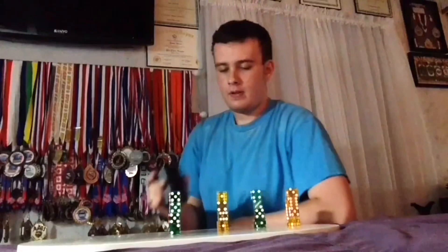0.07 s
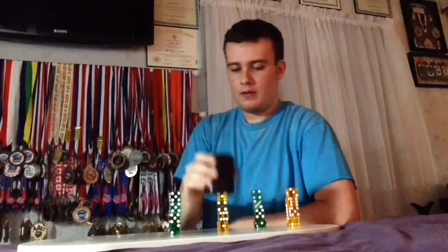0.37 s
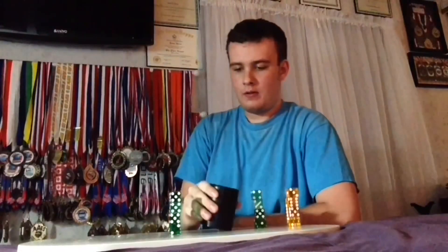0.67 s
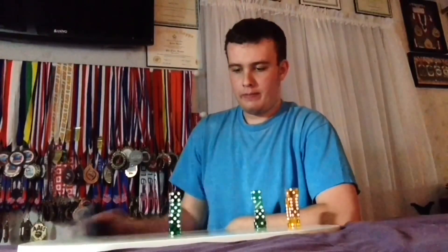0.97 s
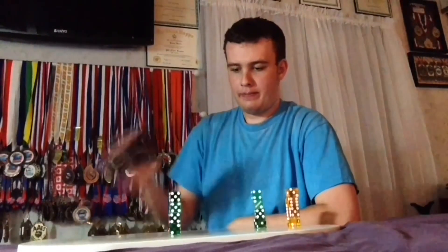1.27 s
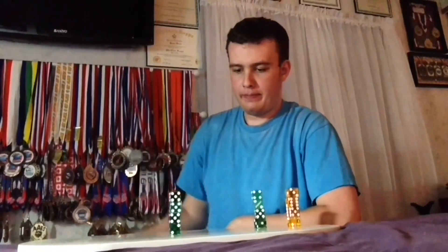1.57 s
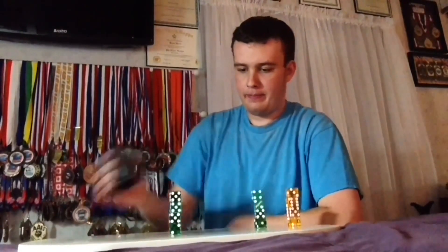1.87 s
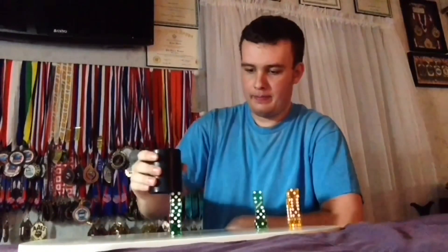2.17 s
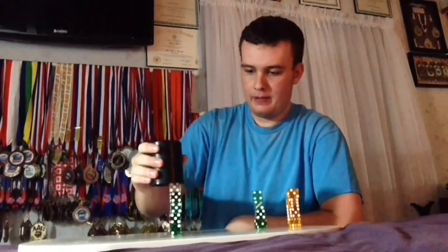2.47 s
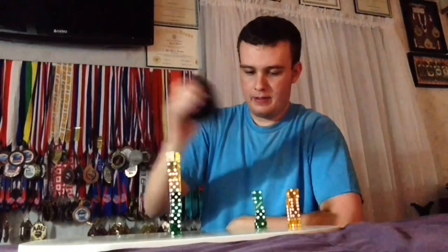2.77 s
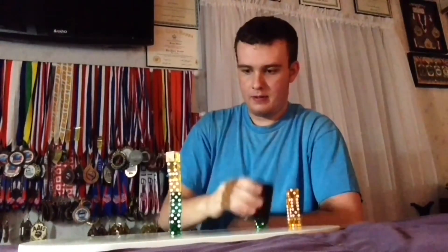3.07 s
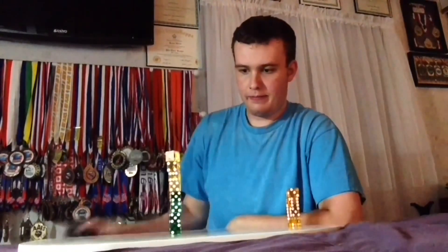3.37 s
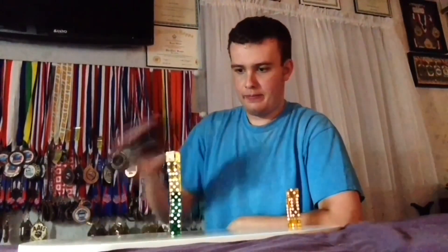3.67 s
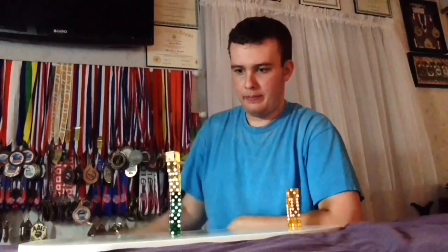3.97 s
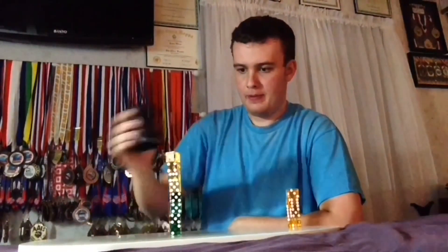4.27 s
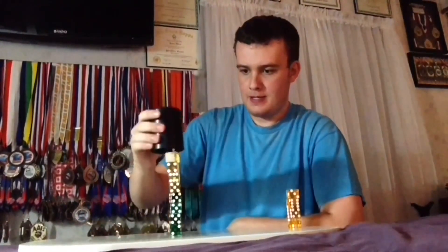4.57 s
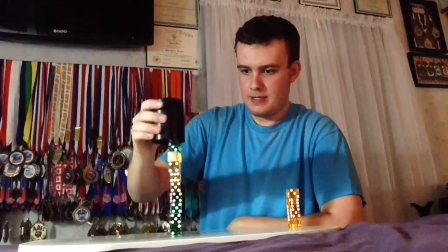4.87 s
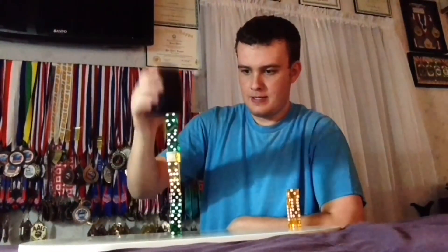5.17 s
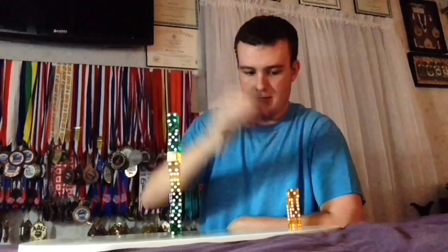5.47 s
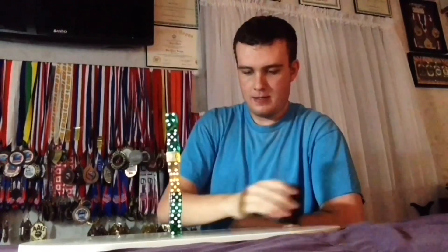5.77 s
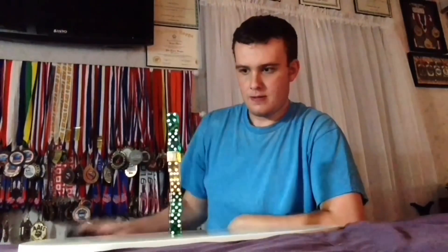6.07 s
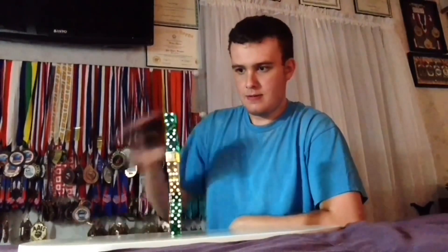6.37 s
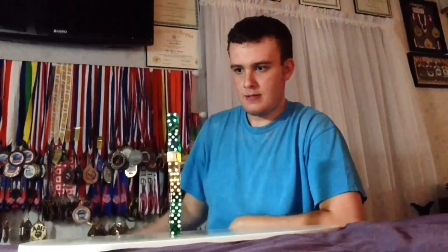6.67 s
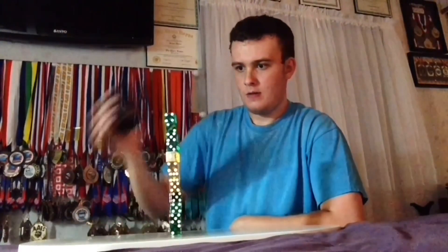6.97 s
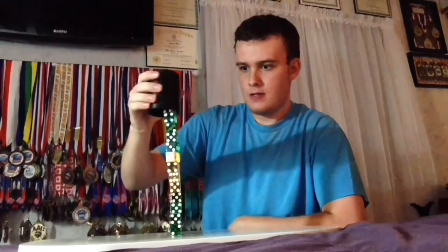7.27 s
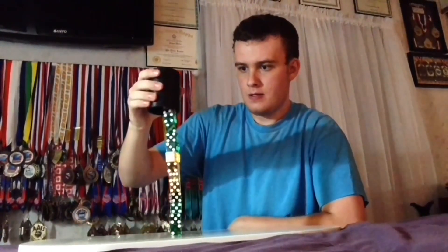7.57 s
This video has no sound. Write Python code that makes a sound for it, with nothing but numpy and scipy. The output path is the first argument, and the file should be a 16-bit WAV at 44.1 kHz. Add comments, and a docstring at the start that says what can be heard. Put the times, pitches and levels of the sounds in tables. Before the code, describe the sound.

A plastic cup scoops dice off a table three times, swirling them with a rattle until they snap into a stack.

```python
"""Dice stacking with a cup

Three times over, a plastic cup knocks on a table and scrapes across it to scoop up dice, then swings so
that they roll and clack round its wall. When it stops dead, inertia slams them into a column.
Each contact is a force that excites resonators: the dice, the cup's wall, the air in the cup, the table.
A small room reverberates briefly over a low steady hum."""
import sys
import numpy as np
from scipy import signal
from scipy.fft import rfft, irfft, next_fast_len
from scipy.io import wavfile
from scipy.ndimage import map_coordinates

SR = 44100
rng = np.random.default_rng(int(sys.argv[2]) if len(sys.argv) > 2 else 0)


def to_wav(sig):
    """Store sig (one row per channel, or 1-D mono) as 16-bit WAV at the path in sys.argv[1].

    Samples outside -1..1 are clipped; the rate is SR.
    """
    pcm = np.clip(np.atleast_2d(sig), -1, 1) * 32767
    pcm = np.round(pcm).astype(np.int16)
    wavfile.write(sys.argv[1], SR, pcm.T)  # frames by channels


N = 335601
SIZE = 16384  # samples in a working block
HZ, AGE = np.fft.rfftfreq(SIZE, 1 / SR), np.arange(SIZE) / SR

# The rim meets the table: (time [s], relative boom level [dB], relative tick level [dB])
RIM_KNOCKS = [(0.55, -24.5, -44.5), (0.556, -46, -36), (0.701, -35, -60), (0.717, -33, -57),
              (3.032, -34.5, -40.5), (3.062, -24, -36.5), (3.071, -21.5, -30), (3.197, -42, -29.5),
              (5.709, -34, -63), (5.859, -38, -54)]
# The rim scoops up dice: (time of hardest push [s], drag [s], trapped air level [dB], grit level [dB])
RIM_SCOOPS = [(0.755, 0.17, -29.5, -35), (3.108, 0.17, -34, -35.5), (5.755, 0.199, -31, -35)]
# Dice slide lightly on the wall between swings: (start [s], end [s], level [dB])
DICE_GLIDES = [(1.1, 1.748, -68.5), (3.394, 3.862, -68.5), (6.105, 6.904, -76)]
# Dice roll: (time of full speed [s], rise [s], hold [s], relative air level [dB], relative dice level [dB])
CUP_SWINGS = [(0.903, 0.065, .09, -44, -41.5), (1.049, 0.037, 0.0067, -42.5, -40.5),
              (1.3, .11, 0.046, -37.5, -38.5), (1.454, .025, 0.084, -39.5, -41),
              (1.869, .065, 0.15, -46, -45), (3.264, .05, 0.122, -42.5, -44),
              (3.658, 0.12, 0.039, -35.5, -39), (3.846, .05, 0.088, -41.5, -42),
              (4.242, 0.073, 0.13, -41, -41), (5.966, 0.074, 0.024, -38.5, -40.5),
              (6.054, 0.044, 0.033, -44.5, -53.5), (6.343, .08, 0.053, -37, -42),
              (6.538, .09, 0.0574, -37.5, -42.5), (6.924, .035, 0.14, -44, -45.5)]
# A die strikes the swinging cup: (time [s], click level [dB], cup air level [dB], wall level [dB])
DIE_CLACKS = [(0.906, -30, -30.5, -42), (0.912, -30, -32, -50.5), (1.051, -33.5, -35.5, -57),
              (1.246, -60, -43, -66), (1.324, -29.5, -30.5, -35), (1.333, -23, -49, -27.5),
              (1.354, -36.5, -48.5, -31), (1.445, -42.5, -33, -42.5), (1.482, -33.5, -36, -44.5),
              (1.535, -40, -39, -55), (1.895, -43.5, -39, -61.5), (3.1, -43, -32, -40),
              (3.109, -31, -34.5, -36), (3.266, -38.5, -38, -51), (3.283, -52, -33.5, -43),
              (3.396, -58, -37, -62), (3.653, -39.5, -32.5, -47), (3.687, -33, -28, -39.5),
              (3.696, -33.5, -48, -45.5), (3.876, -66, -35.5, -57), (3.916, -30.5, -32.5, -38.5),
              (4.246, -34.5, -27.5, -45), (5.749, -38, -33, -54), (5.975, -41, -38, -42),
              (6.063, -53, -37.5, -47.5), (6.312, -59, -39.5, -69.5), (6.365, -32, -36.5, -41),
              (6.533, -49, -37, -45.5), (6.585, -40, -31, -42), (6.97, -34, -36, -60)]
# Dice slam into a column: (time [s], click level [dB], cup air level [dB], relative jolt level [dB])
DICE_SLAMS = [(1.933, -31, -31, -32), (1.941, -24.5, -41, -36.5), (1.952, -23.5, -25.5, -42),
              (1.964, -26, -23.5, -49.5), (1.976, -25.5, -30.5, -45.5), (1.99, -34, -35.5, -51),
              (4.3, -28.5, -45, -33), (4.311, -27, -40.5, -34.5), (4.357, -33.5, -36.5, -56),
              (7.019, -28, -40, -39), (7.026, -36, -39.5, -38), (7.043, -36, -37, -41)]
# The cup touches the stack: (time [s], relative level [dB], ping lift [dB])
STACK_TOUCHES = [(4.782, -52, 13), (5.542, -32, 21), (5.553, -44.5, 20)]

# Resonant modes: (frequency [Hz], width [Hz], lift [dB])
OPEN_CUP_MODES = [(891.5, 140, 12.5), (1008.5, 60, 6), (1557, 90, 13), (1664, 57, 13), (1844, 56, 4.5),
                  (2270, 480, 6.5)]
CLOSED_CUP_MODES = [(487.2, 31, 2.6), (711, 90, 12.7), (776, 100, 9.3), (1578, 230, 7.3), (2440, 170, 10),
                    (3140, 140, 5.5), (3790, 110, 16)]
WALL_MODES = [(2920, 130, 20), (3540, 100, 11)]
TABLE_MODES = [(114, 30, 7.9), (212, 50, 3.9), (352, 54, 2.3)]
STACK_MODES = [(806, 190, 11.5), (1140, 180, 2.2), (2264, 280, 4.9)]  # the standing stack, touched by the cup
COLUMN_MODES = [(4544, 330, 8), (5122, 530, 10)]  # dice pressed together

# Spectral envelopes of the contacts and the hum: (frequency [Hz], relative level [dB])
AIR_SPECTRUM = [(30, -58.5), (90, -43), (250, -15.5), (500, -9.5), (700, -5.5), (1200, 0.5), (2200, -6),
                (3200, -19), (6000, -53.5)]
DICE_SPECTRUM = [(120, -65.5), (600, -39.5), (1800, -10), (2900, -2), (4000, -1), (5300, 0), (6100, -9),
                 (8000, -17), (11500, -25), (14000, -40)]
WALL_SPECTRUM = [(300, -69), (1500, -29.5), (2900, -7.5), (3600, -9), (6000, -50.5)]
CRACK_SPECTRUM = [(200, -60.5), (1500, -18.5), (4500, 3.5), (6500, 3.5), (8500, -3.5), (11500, -6),
                  (14000, -24)]
THUD_SPECTRUM = [(30, -27.5), (70, -19), (130, -11), (220, 1.5), (380, -8), (600, 4), (1100, -15.5),
                 (3000, -51.5)]
RIM_SPECTRUM = [(30, -51), (70, -42), (120, -27), (180, -8.5), (550, -7), (850, -6.5), (1200, -15),
                (1800, -18.5), (2600, -35), (6000, -52)]
SLIDE_SPECTRUM = [(30, -47), (70, -24), (120, -10.5), (190, 1), (320, 0.5), (500, 8), (900, 0), (1300, 7.5),
                  (2100, 7), (3500, 4), (6000, -26.5)]
GRIT_SPECTRUM = [(150, -52), (1000, -17), (2800, -0.5), (4600, -0.5), (5700, -5.5), (7500, -17.5),
                 (11500, -24.5), (14000, -37.5)]
TOUCH_SPECTRUM = [(40, -30.5), (220, 2), (550, 10.5), (1200, 7), (2000, -10.5), (5000, -16.5), (7000, -23),
                  (12000, -34.5)]
GLIDE_SPECTRUM = [(500, -30.5), (2000, -11.5), (4300, -6), (5400, -3.5), (6500, -13), (12000, -21.5)]
HUM_SPECTRUM = [(25, -26), (90, -16), (120, -5), (155, -7), (210, -1), (270, 0), (340, -5), (480, -8),
                (700, -13), (1000, -18), (1350, -15), (2100, -22), (5000, -26), (13500, -31)]

# Decay of the room: (frequency [Hz], time to fall 60 dB [s])
REVERB_TIMES = [(150, 0.25), (700, 0.17), (1600, 0.17), (5000, 0.14), (11000, 0.2)]


def amp(db):
    """Decibels to amplitude ratio."""
    return 10 ** (np.asarray(db) / 20)


def unit(x):
    """Normalise to rms 1."""
    return x / np.sqrt(np.mean(x ** 2) + 1e-20)


def attack_unit(ring):
    """Normalise a transient to rms 1 over its first 6 ms."""
    return ring / np.sqrt(np.mean(ring[:SR // 160] ** 2))


def along(points, hz):
    """Interpolate (frequency, value) points on a logarithmic frequency axis."""
    f, v = np.transpose(points)
    return np.interp(np.log(hz + 1), np.log(f + 1), v)


def add(track, s, sound):
    """Superposition: a sound adds to the track from time s."""
    part = track[round(s * SR):][:len(sound)]
    part += sound[:len(part)]


def wobble(n, rate):
    """Smooth random modulation: a spline through `rate` knots a second."""
    return map_coordinates(rng.standard_normal(256), [np.arange(n) * rate / SR], mode="mirror")


def body(spectrum, modes=()):
    """Resonance: the minimum-phase impulse response of a spectral envelope with modal peaks."""
    peaks_db = sum(lift / (1 + (2 * (HZ - hz) / width) ** 2) for hz, width, lift in modes)
    cepstrum = irfft(np.log(amp(along(spectrum, HZ) + peaks_db)))
    cepstrum[1:SIZE // 2] *= 2  # folding onto positive time makes the response causal
    cepstrum[SIZE // 2 + 1:] = 0
    return irfft(np.exp(rfft(cepstrum)))[:SIZE // 4]


def cup_air(scatter):
    """Cavity resonance: the open cup's air modes shift together with how it is held over the table."""
    detune = 1 + scatter * rng.standard_normal()
    return body(AIR_SPECTRUM, [(hz * detune, width, lift) for hz, width, lift in OPEN_CUP_MODES])


def strike(response, contact_s, chatter, t60):
    """Impact excitation: a short rough push and a decaying chatter of the faces drive a body."""
    t = AGE[:SIZE // 8]
    push = t / contact_s * np.exp(1 - t / contact_s)
    force = rng.standard_normal(len(t)) * (push + chatter * amp(-60 * t / t60))
    return attack_unit(signal.fftconvolve(force, response)[:SIZE // 4])


def patter(n, rate, spread_db, rub):
    """Shot noise: tiny uneven contacts, on average `rate` a second, over a smooth rub."""
    sizes = amp(spread_db * np.clip(rng.standard_normal(n), -2, 2)) * rng.choice([-1, 1], n)
    contacts = rng.random(n) < rate / SR
    return unit(sizes * contacts) + rub * rng.standard_normal(n)


def stroke(force, level_db, parts):
    """Forced vibration: one running force drives each (body, level [dB]) under a common envelope."""
    return amp(level_db) * sum(amp(db) * unit(signal.fftconvolve(force, h)[:len(force)]) for h, db in parts)


def room(x, wet_db, delay_s):
    """Reverberation: a diffuse decaying tail, different for each place of the cup, follows the sound."""
    hz, t, noise = signal.stft(rng.standard_normal(SIZE), SR, nperseg=256)
    decay = amp(-60 * t / along(REVERB_TIMES, hz)[:, None])
    tail = signal.istft(noise * decay, SR, nperseg=256)[1][:SIZE]
    tail *= np.clip(AGE / delay_s - .5, 0, 1)
    response = amp(wet_db) * tail / np.linalg.norm(tail)
    response[0] = 1  # direct path
    return signal.fftconvolve(x, response)


def hum(level_db=-69.5):
    """Stationary noise: the room's low hum with a faint hiss."""
    colour = amp(along(HUM_SPECTRUM, np.fft.rfftfreq(N, 1 / SR)))
    return amp(level_db) * unit(irfft(rfft(rng.standard_normal(N)) * colour, N))


def glides(fade_s=.05):
    """Sliding friction: dice hiss thinly on the wall while the cup turns."""
    out = np.zeros(N)
    t = np.arange(SR) / SR
    for start, end, db in DICE_GLIDES:
        fade = np.clip(np.minimum(t, end - start - t) / fade_s, 0, 1)
        add(out, start, fade * stroke(rng.standard_normal(SR), db, [(body(GLIDE_SPECTRUM), 0)]))
    return out


def touches(ping_hz=4520, ping_width_hz=500):
    """Free vibration: touched by the cup, the stacked dice give a knock and a bright ping."""
    out = np.zeros(N)
    for s, db, ping_db in STACK_TOUCHES:
        stack = body(TOUCH_SPECTRUM, STACK_MODES + [(ping_hz, ping_width_hz, ping_db)])
        tap = amp(db - 12.5) * strike(stack, contact_s=.00025, chatter=.037, t60=.017)
        add(out, s, room(tap, wet_db=6, delay_s=.0043))
    return out


def knocks():
    """Impact of the rim: it ticks, the table booms and the enclosed air resonates."""
    out = np.zeros(N)
    boom = body(RIM_SPECTRUM, CLOSED_CUP_MODES + TABLE_MODES)
    tick = body(GRIT_SPECTRUM, [(5200, 210, 6.8)])
    for s, boom_db, tick_db in RIM_KNOCKS:
        blow = amp(boom_db - 10) * strike(boom, contact_s=.0028, chatter=.1, t60=.03)
        blow += amp(tick_db - 14.5) * strike(tick, contact_s=.0039, chatter=.2, t60=.04)
        add(out, s, room(blow, wet_db=1.5, delay_s=.006))
    return out


def scoops(push_s=.026, drag_db=-14):
    """Friction drives the closed cavity: the rim bites, eases to a light drag on the table and lifts."""
    out = np.zeros(N)
    bite_db_per_s, ease_db_per_s, lift_db_per_s = 553, 179.5, 900
    age = np.arange(-SR // 20, SR // 4) / SR  # zero at the hardest push
    slide, grit = body(SLIDE_SPECTRUM, CLOSED_CUP_MODES), body(GRIT_SPECTRUM)
    for s, drag_s, air_db, grit_db in RIM_SCOOPS:
        bite_db = bite_db_per_s * np.minimum(age, 0)
        ease_db = np.maximum(-ease_db_per_s * np.maximum(age - push_s, 0), drag_db)
        lift_db = -lift_db_per_s * np.maximum(age - drag_s, 0)
        force = patter(len(age), rate=2000, spread_db=3.5, rub=.98)
        rasp = stroke(force, bite_db + ease_db + lift_db, [(slide, air_db), (grit, grit_db)])
        add(out, s + age[0], room(rasp, wet_db=-6.5, delay_s=.0054))
    return out


def swings(dice=3, lead_s=.05):
    """Rolling contact: dice gather speed round the wall and settle, exciting their modes and the air."""
    out = np.zeros(N)
    rise_db, sag_db_per_s, settle_db_per_s = 28, 4, 308
    t = np.arange(SR // 2) / SR
    for s, rise_s, hold_s, air_db, dice_db in CUP_SWINGS:
        age = t - rise_s - lead_s  # zero at full speed
        level_db = np.minimum(rise_db * age / rise_s, -sag_db_per_s * age)
        level_db -= settle_db_per_s * np.maximum(age - hold_s, 0)
        air = cup_air(scatter=.012)
        roll = np.zeros(len(t))
        for _ in range(dice):
            modes = [(rng.uniform(1700, 4200), 110, 12), (rng.uniform(4300, 5300), 140, 11)]
            die = body(DICE_SPECTRUM, modes)
            force = patter(len(t), rate=260, spread_db=2, rub=.35)
            tumble = unit(amp(3 * wobble(len(t), rate=40)))  # now one die presses harder, now another
            roll += tumble * stroke(force, level_db, [(air, air_db), (die, dice_db)])
        add(out, s - rise_s - lead_s, room(amp(-2) * roll / np.sqrt(dice), wet_db=0, delay_s=.0044))
    return out


def die_blow(modes, click_db, air_db, wall_db, crack_db, thud_db):
    """Modal excitation: one impact rings die, air and wall, with an edge crack and a dull table thud."""
    air = cup_air(scatter=.014)
    spot = [(hz, 150, 8) for hz in rng.uniform(1700, 4800, size=2)]  # each spot of the wall has its ring
    click = body(DICE_SPECTRUM, spot + modes)
    wall = body(WALL_SPECTRUM, WALL_MODES)
    blow = amp(click_db) * strike(click, contact_s=.0014, chatter=.13, t60=.034)
    blow += amp(air_db) * strike(air, contact_s=.0012, chatter=.1, t60=.03)
    blow += amp(wall_db) * strike(wall, contact_s=.0004, chatter=.03, t60=.012)
    blow += amp(crack_db) * strike(body(CRACK_SPECTRUM), contact_s=.002, chatter=.6, t60=.08)
    blow += amp(thud_db) * attack_unit(body(THUD_SPECTRUM, TABLE_MODES))
    return room(blow, wet_db=-1, delay_s=.004)


def clacks(die_hz=4673, scatter=.029):
    """Glancing collisions: loose dice rebound from the wall, each at a slightly different pitch."""
    out = np.zeros(N)
    for s, db, air_db, wall_db in DIE_CLACKS:
        ring = [(die_hz * (1 + scatter * rng.standard_normal()), 360, 12)]
        add(out, s, die_blow(ring, db, air_db, wall_db, crack_db=db - 31.5, thud_db=air_db - 30))
    return out


def slams(shudder_db=-10.5, fall_db_per_s=329.5):
    """Inertia: the cup stops dead and the dice slam into a column that rings brightly and shudders."""
    out = np.zeros(N)
    column = body(DICE_SPECTRUM, COLUMN_MODES)
    for s, db, air_db, jolt_db in DICE_SLAMS:
        add(out, s, die_blow(COLUMN_MODES, db, air_db, wall_db=db - 17,
                             crack_db=jolt_db + 1.5, thud_db=jolt_db - 4.5))
        force = patter(SIZE, rate=600, spread_db=3.5, rub=.4)
        shudder = stroke(force, db - fall_db_per_s * AGE, [(column, shudder_db)])
        add(out, s, room(shudder, wet_db=-3, delay_s=.004))
    return out


def scene():
    """Superposition: the pressures of all sources add at one point."""
    return (hum() + glides() + touches() + knocks() + scoops() + swings() + clacks() + slams())[None]


def record(dry, top_hz=13900):
    """Band limiting: the sound fades in quickly and passes an ideal low-pass filter."""
    fade_in = np.clip((np.arange(N) / SR - .055) / .039, 0, 1)
    size = next_fast_len(N + SIZE)
    passband = np.fft.rfftfreq(size, 1 / SR) < top_hz
    return irfft(rfft(dry * fade_in, size) * passband, size)[:, :N]


dry = scene()
out = record(dry)
to_wav(out)
```